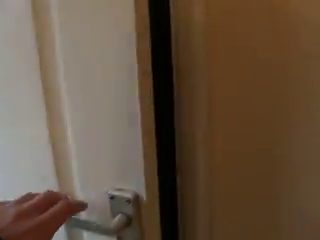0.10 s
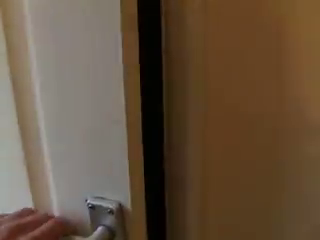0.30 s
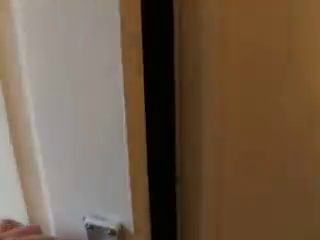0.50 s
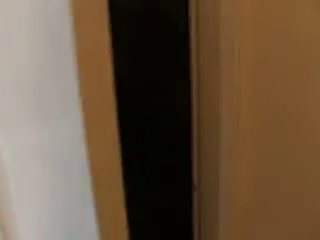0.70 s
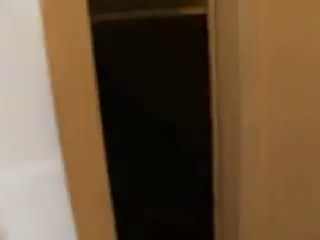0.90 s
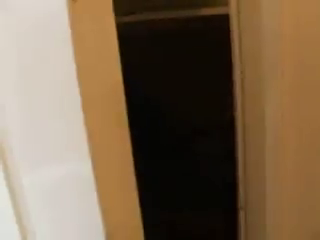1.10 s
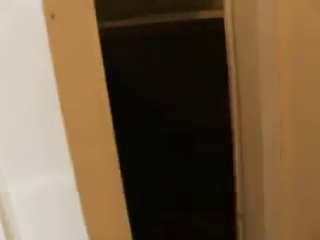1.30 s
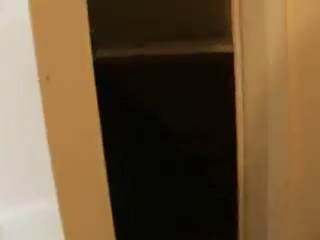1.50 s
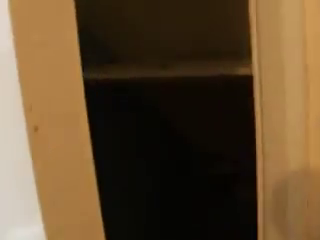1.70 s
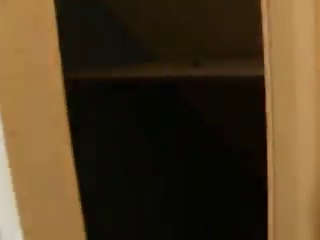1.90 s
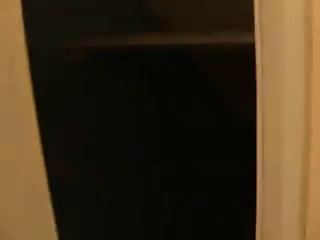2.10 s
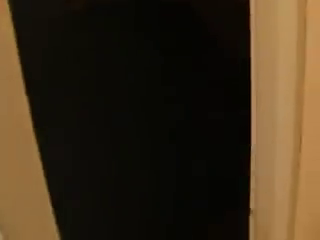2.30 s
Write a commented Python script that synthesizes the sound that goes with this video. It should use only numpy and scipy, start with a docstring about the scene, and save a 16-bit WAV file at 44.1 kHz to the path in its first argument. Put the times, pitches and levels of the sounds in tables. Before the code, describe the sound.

Lever handle latch cracks sharply as a wooden door opens, followed by one step on floorboards

```python
"""In a small hallway a lever handle is pressed, its latch snaps back and a wooden door swings open.
A sharp click and one heavy footfall follow, then lighter knocks and creaks of the floor.
Metal, wood and boards are sums of decaying modes; contacts and rubbing are shaped noise.
A small microphone close by hisses steadily and overloads on the snap."""
import sys
import numpy as np
from scipy import signal
from scipy.fft import rfft, irfft
from scipy.io import wavfile
from scipy.ndimage import uniform_filter1d

SR = 44100
rng = np.random.default_rng(int(sys.argv[2]) if len(sys.argv) > 2 else 0)


def digitize_waveform(pressure):
    """Quantize a signal to 16-bit integers and store it at the path in sys.argv[1].

    Rows of a 2-D input are taken as channels; values are limited to [-1, 1].
    """
    field = np.atleast_2d(pressure).T
    bounded = np.clip(field, -1, 1)
    quanta = np.round(bounded * 32767).astype(np.int16)
    wavfile.write(sys.argv[1], SR, quanta)


N = 105840

# blows of the latch bolt: [t/s, level/dB, tilt/(dB per octave), ring length factor]
LATCH_BLOWS = [(0.2335, -0.5, -2, 0.69), (0.2444, -18, -2.5, 0.74), (0.2593, -34, -7, 0.64)]
# modes of handle and latch: [f/Hz, level/dB, T60/s at ring length factor 1]
METAL_MODES = [(773, -24.5, 0.034), (1390, -19, .03), (1416, -19.5, 0.042), (1740, -14, 0.036),
               (1983, -10, 0.016), (2236, -3.5, 0.017), (2572, 0, 0.041), (2850, -22, 0.031),
               (3800, -16.5, 0.072), (4000, -32, .03), (4870, -10, 0.03), (5400, -27, 0.016),
               (5930, -4, 0.014), (6720, -22, 0.059), (7060, -16, 0.043), (8130, -19, 0.078)]
# spectrum of the lock case's clatter: [f/Hz, relative level per Hz/dB]
CASE_SPECTRUM = [(60, -40), (140, -2), (400, -14), (750, -17), (1050, -19), (1700, -4), (2300, 11),
                 (3100, -7.5), (5200, 2.5), (8000, -5)]
# the heavy footfall: [f/Hz, relative level per Hz/dB], and its decay: [f/Hz, T60/s]
STEP_SPECTRUM = [(20, 4), (60, 4), (100, 3.5), (240, -0.5), (400, -3), (700, -2.5), (1300, -1),
                 (1700, -11.5), (2600, -16), (3600, -13.5), (5000, -10.5), (8000, -13)]
STEP_DECAY = [(30, 1.5), (120, 0.58), (400, 0.84), (1100, 0.42), (2500, 0.6), (7000, 0.51)]
# modes of the floorboards taking the weight: [f/Hz, level/dB, T60/s]
BOARD_MODES = [(88.6, -39.5, 0.72), (142.5, -34, 0.46), (203, -45, 0.6), (261.5, -43.5, 0.69),
               (386.2, -43, 0.86), (414, -49, .5), (565, -52, .5), (700, -48, 0.55), (1220, -47.5, 0.32)]
# small dry clicks of handle, door and floor: [t/s, level/dB, centre f/Hz, width/octaves, T60/s]
TICKS = [(0.0848, -33, 860, 0.72, 0.053), (0.188, -36.5, 2120, 0.44, 0.069),
         (0.194, -26.5, 6860, 1.5, 0.034), (.1978, -28, 5940, .3, 0.013), (0.2032, -31, 3960, 1, 0.036),
         (0.2141, -25.5, 5200, .22, .012), (0.216, -25, 1790, 1.3, 0.061), (0.2338, -10, 5800, 0.53, 0.015),
         (0.2375, -19, 2140, 0.4, 0.012), (0.8584, -21, 5830, 0.27, 0.0062),
         (0.8588, -23.5, 2370, 0.74, 0.0075), (0.8626, -27.5, 2630, 2, 0.033),
         (.9132, -27, 5000, 0.37, 0.028), (0.917, -24, 5500, 0.68, 0.0043),
         (.9176, -20.5, 5470, .8, 0.0067), (0.9154, -28.5, 1040, 0.21, .07),
         (0.9204, -24, 5770, 0.55, 0.0026), (.9238, -21.5, 6400, 0.73, 0.0048),
         (0.9317, -34, 1320, 0.29, 0.013), (0.9637, -38.5, 1570, .5, 0.039),
         (.9815, -32.5, 1190, 1.3, 0.052), (0.994, -31.5, 2050, 0.3, 0.08),
         (1.7564, -38.5, 2170, 0.31, 0.35), (1.8528, -27.5, 3960, 2.9, 0.024), (1.858, -45, 5300, .06, .25),
         (1.862, -39.5, 1730, .3, 0.23), (2.3647, -39.5, 2540, 1.5, 0.044)]
# knocks on hollow wood: [t/s, level/dB, centre f/Hz, width/octaves, T60/s]
KNOCKS = [(.312, -44.5, 450, 0.58, 0.43), (0.321, -48.5, 224, 0.081, 0.47), (0.457, -52.5, 496, 0.63, 0.44),
          (.918, -38, 264, 0.64, .1), (0.944, -36, 390, 0.86, 0.14), (0.997, -52, 262, 0.5, 0.075),
          (1.752, -44, 250, 0.72, 0.43), (1.845, -50.5, 430, 0.16, 0.4), (1.944, -56.5, 234, 0.43, 0.19)]
# modes of the woodwork: [f/Hz, level/dB]
WOOD_MODES = [(145, 6), (182, -1), (231, -2.5), (266, 4), (339, -3), (392, -3.5), (440, -7), (495, -3),
              (565, -2.5), (660, -1)]
# shoes, clothes and door rubbing: [t/s, level/dB, centre f/Hz, width/octaves, rise/s, T60/s]
SCUFFS = [(0.249, -44.5, 5950, 0.28, 0.0091, 0.56), (.305, -46, 890, 1.9, 0.0065, 0.29),
          (0.451, -43, 1300, 0.78, 0.026, 0.28), (.785, -48.5, 6040, 1.1, .01, 0.31),
          (0.863, -39.5, 2500, 1.8, 0.015, 0.47), (1.13, -49.5, 1050, 1.3, 0.21, 1.4),
          (1.499, -52.5, 6300, 0.34, 0.15, .6), (1.753, -42.5, 6660, 0.81, 0.0019, 0.49),
          (1.757, -50, 3200, .5, .006, 0.5), (1.854, -40.5, 3930, 2, 0.0074, 0.22),
          (2.362, -44.5, 5600, .9, 0.0019, 0.26)]
# decay of the hallway's tail: [f/Hz, T60/s]
HALL_DECAY = [(150, .5), (600, 0.13), (2500, 0.11), (7000, 0.81)]
# steady hiss: [f/Hz, relative level per Hz/dB], and its course: [t/s, level/dB]
HISS_SPECTRUM = [(15, 17.5), (35, 1.5), (60, 5.5), (120, 2.5), (400, 2), (750, 2.5), (1300, 2), (2400, 1.5),
                 (4000, -0.5), (7000, 1.5), (8500, -3)]
HISS_LEVEL = [(0, -46), (.15, -46.5), (.6, -49), (.8, -48.5), (1.2, -49), (1.4, -48), (1.62, -46),
              (1.75, -47.5), (2.05, -47.5), (2.4, -47.5)]
# course of the low rumble: [t/s, level/dB]
RUMBLE_LEVEL = [(0, -82), (.8, -67), (.92, -65), (1.3, -77), (1.7, -57.5), (1.92, -54), (2.1, -65),
                (2.4, -90)]

# time axis of one contact and the matching frequency axis
T = np.arange(int(0.8 * SR)) / SR
HZ = np.fft.rfftfreq(len(T), 1 / SR)

RING_DB, LATCH_LOW_HZ = -5, 476
CASE_DB, CASE_T60_S, CRACK_DB, CRACK_T60_S = -13.5, 0.065, -1, 0.0095
STEP_S, STEP_DB, STEP_RISE_S = 0.916, -28, 0.0057
STEP_GRAIN_DB, STEP_GRAIN_S = 1, 0.005
THUMP_LAG_S, THUMP_HZ, THUMP_WIDTH_S, THUMP_DB = 0.0324, 58.7, 0.0082, -26
BOARDS_LAG_S, BOARDS_RISE_S = 0.03, 0.023
TICK_SNAP, TICK_RISE_S = 0.79, 0.00062  # share of the first contact against the clatter after it
KNOCK_RISE_S, KNOCK_GRAIN_DB = 0.0011, 0.5
SCUFF_GRAIN_DB, SCUFF_GRAIN_SAMPLES = 3.0, 90
HALL_DB, HALL_RISE_S = -23.5, 0.0061
RUMBLE_HZ = 30
MIC_EDGE_HZ, BAND_EDGE_HZ = 8350, 16300
CEILING, OFFSET = 0.75, -0.0024  # in units of full scale


def latch(level_db, tilt_db, length):
    """Impact excitation: the bolt hits its stop, metal modes and lock case ring, with little bass."""
    def tilt(hz):
        return amp(tilt_db * np.log2(np.maximum(hz, 300) / 3000))

    ring = sum(amp(db) * tilt(f) * np.cos(2 * np.pi * f * T) * fade(t60 * length)
               for f, db, t60 in METAL_MODES)
    envelope = amp(CASE_DB) * fade(CASE_T60_S * length) + amp(CRACK_DB) * fade(CRACK_T60_S * length)
    clatter = noise(amp(read(CASE_SPECTRUM, HZ)) * tilt(HZ)) * envelope
    blow = amp(RING_DB) * ring + clatter
    b, a = signal.butter(2, LATCH_LOW_HZ, "high", fs=SR)
    return amp(level_db) * signal.lfilter(b, a, blow)


def footfall():
    """Superposition: a rough, wide crunch, a low thump as the weight lands, and ringing boards."""
    grain_t = np.arange(1000) * STEP_GRAIN_S
    grain = amp(STEP_GRAIN_DB * np.interp(T, grain_t, rng.standard_normal(size=1000)))
    crunch = unit(noise(amp(read(STEP_SPECTRUM, HZ))) * grain)
    out = amp(STEP_DB) * dying(crunch, STEP_DECAY, STEP_RISE_S)

    t = T - THUMP_LAG_S
    thump = np.sin(2 * np.pi * THUMP_HZ * t) * np.exp(-(t / THUMP_WIDTH_S) ** 2)
    out -= amp(THUMP_DB) * thump

    boards = sum(amp(db) * np.sin(2 * np.pi * f * T) * fade(t60, BOARDS_RISE_S)
                 for f, db, t60 in BOARD_MODES)
    add(out, BOARDS_LAG_S, boards)
    return out


def tick(level_db, hz, octaves, t60):
    """Impulse response: one sharp contact sets off a short clatter of the same colour."""
    colour = hump(HZ, hz, octaves)
    snap = pulse(colour)
    snap = 2 * TICK_SNAP * snap / abs(snap).max()
    clatter = np.sqrt(1 - TICK_SNAP ** 2) * noise(colour) * fade(t60, TICK_RISE_S)
    return amp(level_db) * (snap + clatter)


def knock(level_db, hz, octaves, t60):
    """Modal excitation: a soft blow wakes the wood's modes around one pitch."""
    ring = sum(amp(db) * hump(f, hz, octaves) * np.sin(2 * np.pi * (f * T + rng.random()))
               for f, db in WOOD_MODES)
    grain = amp(KNOCK_GRAIN_DB) * noise(hump(HZ, hz, octaves))
    return amp(level_db) * (unit(ring) + grain) * fade(t60, KNOCK_RISE_S)


def scuff(level_db, hz, octaves, rise, t60):
    """Friction: irregular grains modulate coloured noise that swells and dies."""
    drift = unit(uniform_filter1d(rng.standard_normal(len(T)), size=SCUFF_GRAIN_SAMPLES))
    rubbing = noise(hump(HZ, hz, octaves)) * amp(SCUFF_GRAIN_DB * drift)
    return amp(level_db) * unit(rubbing) * fade(t60, rise)


def hallway(x):
    """Reverberation: convolution with decaying noise adds a short, faint tail off the walls."""
    tail = dying(noise(np.ones(len(HZ))), HALL_DECAY, HALL_RISE_S)
    tail = tail / np.linalg.norm(tail)
    return x + amp(HALL_DB) * signal.fftconvolve(x, tail)[:N]


def background():
    """Stationary noise: a nearly even hiss over a faint rumble that slowly changes in level."""
    hz, t = np.fft.rfftfreq(N, 1 / SR), np.arange(N) / SR
    hiss = noise(amp(read(HISS_SPECTRUM, hz))) * amp(np.interp(t, *np.transpose(HISS_LEVEL)))
    rumble = noise(hump(hz, RUMBLE_HZ, 1.0)) * amp(np.interp(t, *np.transpose(RUMBLE_LEVEL)))
    return hiss + rumble


def amp(db):
    """Level definition: decibels to amplitude gain."""
    return 10 ** (np.asarray(db) / 20)


def unit(x):
    """Normalisation: scales to rms 1."""
    return x / np.sqrt(np.mean(x ** 2) + 1e-20)


def read(points, hz):
    """Interpolation: reads a table along a log-frequency axis."""
    f, value = np.transpose(points)
    return np.interp(np.log(hz + 1), np.log(f), value)


def add(mix, s, sound):
    """Linear superposition: mixes a sound in, in place, at time s."""
    part = mix[round(s * SR):][:len(sound)]
    part += sound[:len(part)]


def fade(t60, rise=1e-4):
    """Damping: a linear rise, then an exponential decay by 60 dB in t60."""
    return np.minimum(T / rise, 1) * np.exp(-np.log(1000) * np.maximum(T - rise, 0) / t60)


def hump(hz, centre_hz, octaves):
    """Resonance: gain of a broad peak on an octave scale."""
    distance = np.log2((hz + 1) / centre_hz) / octaves
    return 1 / (1 + distance ** 2 / 2) ** 2


def noise(gain):
    """Random phase: noise of rms 1 with the given spectrum."""
    phase = 2 * np.pi * rng.random(len(gain))
    return unit(irfft(gain * np.exp(1j * phase)))


def pulse(gain):
    """Minimum phase: the Hilbert transform of the log spectrum makes a causal click of energy 1."""
    log = np.log(np.maximum(gain / gain.max(), 1e-4))
    both_sides = np.r_[log, log[-2:0:-1]]
    click = np.fft.ifft(np.exp(np.conj(signal.hilbert(both_sides)))).real
    return click / np.linalg.norm(click)


def dying(x, t60s, rise, count=9):
    """Frequency-dependent damping: overlapping bands an octave apart each die at their own speed."""
    centres, z = np.geomspace(30, 8000, count), rfft(x)
    out = np.zeros(len(T))
    for f, row in zip(centres, np.eye(count)):
        band = irfft(z * read(list(zip(centres, row)), HZ))
        out += band * fade(read(t60s, f), rise)
    return out


def lowpass(x, hz, taps):
    """Linear-phase filtering: a steep low-pass."""
    return signal.fftconvolve(x, signal.firwin(taps, hz, window=("kaiser", 8), fs=SR), "same")


def scene():
    """Superposition: all contacts sound in the hallway over the hiss."""
    mix = np.zeros(N)
    add(mix, STEP_S, footfall())
    for source, table in (latch, LATCH_BLOWS), (knock, KNOCKS), (scuff, SCUFFS), (tick, TICKS):
        for s, *row in table:
            add(mix, s, source(*row))
    return (hallway(mix) + background())[None]


def record(dry):
    """Saturation: a narrow-band microphone overloads softly, then band limit and converter offset."""
    x = lowpass(dry[0], MIC_EDGE_HZ, taps=141)
    x = x / (1 + (x / CEILING) ** 4) ** (1 / 4)
    return lowpass(x, BAND_EDGE_HZ, taps=255)[None] + OFFSET


dry = scene()
out = record(dry)
digitize_waveform(out)
```